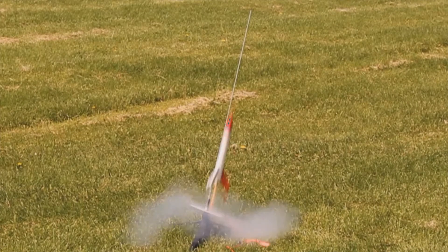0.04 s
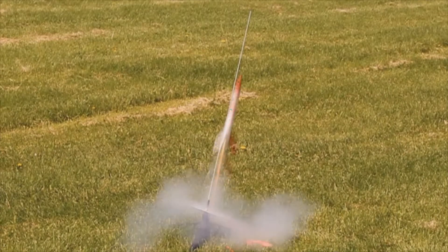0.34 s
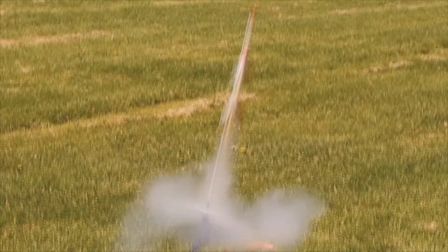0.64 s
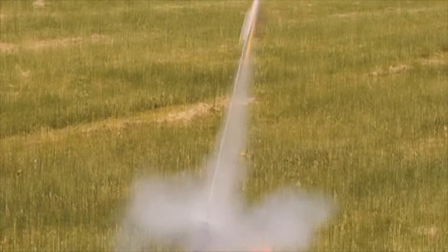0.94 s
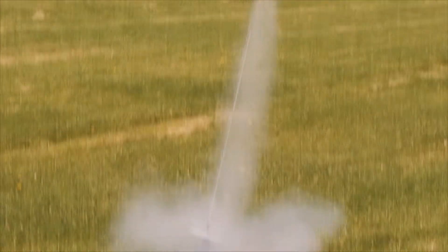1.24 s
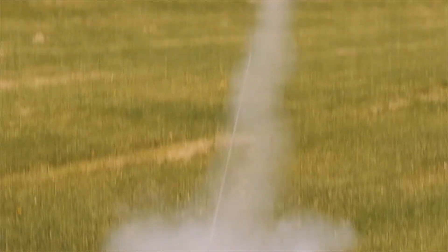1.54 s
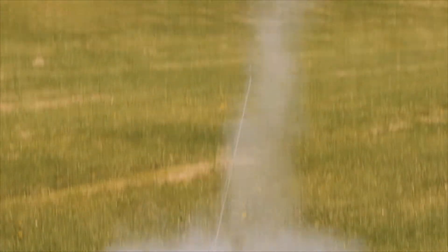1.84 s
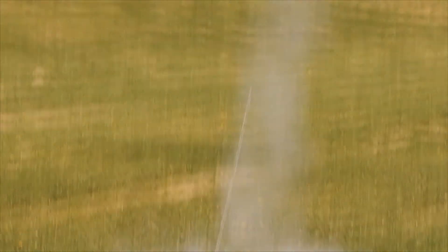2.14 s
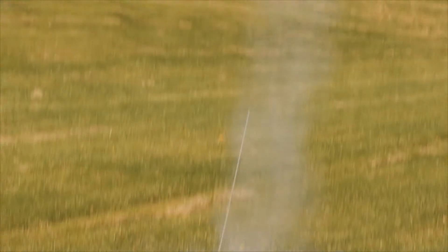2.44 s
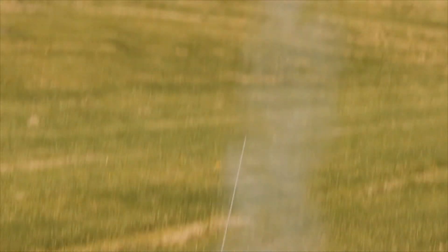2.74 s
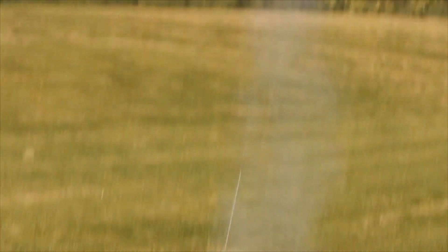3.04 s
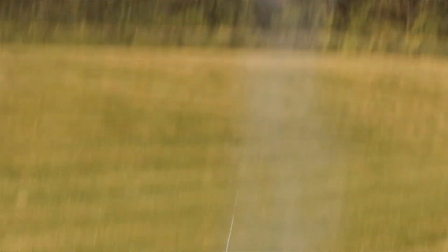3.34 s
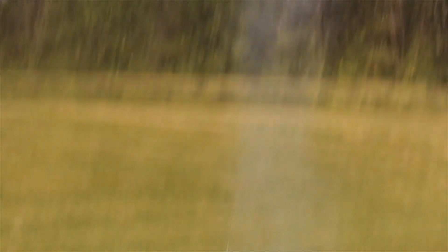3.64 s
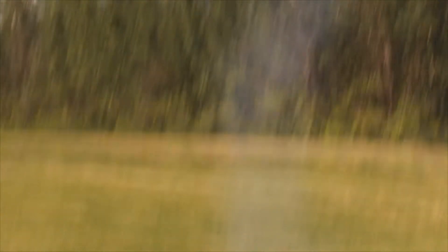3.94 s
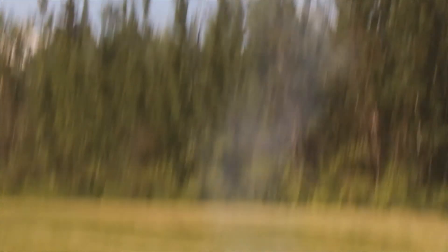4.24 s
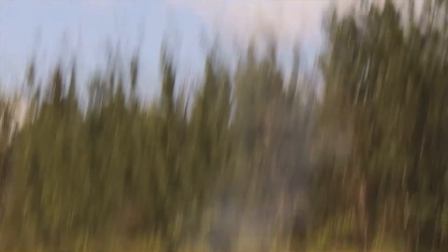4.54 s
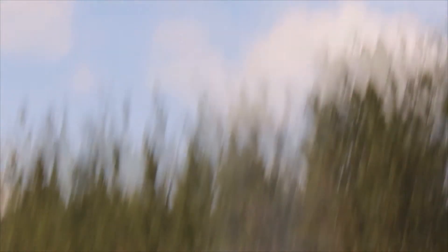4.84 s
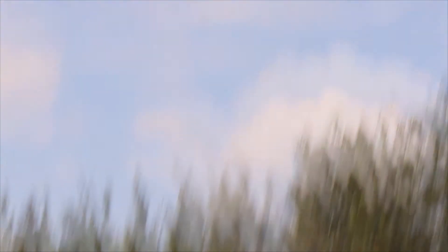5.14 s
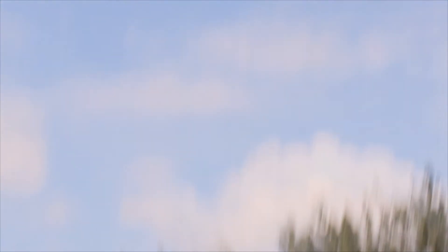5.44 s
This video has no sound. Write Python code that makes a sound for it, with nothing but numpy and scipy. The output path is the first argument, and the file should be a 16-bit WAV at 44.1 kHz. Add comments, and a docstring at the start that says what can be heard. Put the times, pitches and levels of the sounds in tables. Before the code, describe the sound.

A model rocket launches in an open field, slowed down so that it sounds deep and dull, heard from one microphone away from the pad. The roar is loud from the start, hollow and surging as the exhaust strikes the launch plate, with a crackling hiss above and a low shudder beneath. The propellant pops at about 0.1, 0.2 and 0.6 seconds, most strongly at 1.1, and again at 1.7. Three faint, thin, dry ticks fall within the first 0.4 seconds. Between 1 and 2.5 seconds the roar rises a little in pitch and becomes a freer, slightly quieter rush, with the crackle a bit brighter. It holds fairly steady and swells slightly around 4 seconds. At about 4.5 seconds the motor burns out; the roar sinks in pitch and fades with the hiss, leaving a faint, fading low rumble until about 5.7 seconds.

```python
"""Model rocket launch in slow motion

One microphone in a field, off from the launch pad; slowed down, everything sounds deep and dull.
The exhaust first beats on the blast plate, then roars freely, crackling and popping as the
propellant burns unevenly. The roar dies away and leaves a low rumble over the field."""
import sys
import numpy as np
from scipy import signal
from scipy.fft import rfft, irfft, next_fast_len
from scipy.io import wavfile
from scipy.ndimage import uniform_filter1d, minimum_filter1d, map_coordinates

SR = 44100
rng = np.random.default_rng(int(sys.argv[2]) if len(sys.argv) > 2 else 0)


def store_wav(level_fs):
    """Save 16-bit WAV to argv[1]."""
    pcm = np.round(np.clip(np.atleast_2d(level_fs), -1, 1) * 32767)
    wavfile.write(sys.argv[1], SR, pcm.T.astype(np.int16))


N = 250488
TIME = np.arange(N) / SR
BURNOUT_S, TOP_HZ = 4.518, 2440  # the motor stops; the top of the slowed-down band

# Loudness of the roar while the motor burns: time_s, level_db
ROAR_LEVEL = [(0.03, -13), (0.04, -15.5), (0.18, -11), (0.46, -18.5), (0.56, -15), (0.6, -19),
              (1.03, -15.5), (1.06, -13.5), (1.11, -19.5), (1.39, -23.5), (1.53, -17), (2.23, -27),
              (2.26, -21), (3.56, -21.5), (4.12, -18), (4.5, -20.5), (4.6, -17.5)]
# Centre of the free jet's roar: time_s, pitch_hz
ROAR_PITCH = [(1.1, 219), (2.4, 345), (3.2, 369), (4.2, 364), (4.8, 309.7), (5.68, 159.5)]
# Humps in the free jet's spectrum, relative to that centre: pitch_ratio, width_ratio, level_db
ROAR_HUMPS = [(.62, .5, -3), (1.08, 0.52, 0.5), (1.6, 0.66, -9)]
# Low, hollow resonances of the jet on the plate: pitch_hz, width_hz, level_db
PLATE_LOW_MODES = [(190, 42, 0), (284, 48, -1), (440, 410, -5), (640, 79, -6.5), (724, 100, -7.5)]
def roar(edge_hz=800, flutter_db=0.75, trim_db=0.08):
    """Large eddies make a broad, humped roar that rises in pitch as the jet clears the ground."""
    roll_off = lambda hz: 1 / (1 + (hz / edge_hz) ** 6)
    on_plate = lambda hz, t: resonances(PLATE_LOW_MODES, hz) * roll_off(hz)

    def free(hz, t):
        centre_hz = curve(ROAR_PITCH, t)
        humps = [(ratio * centre_hz, width * centre_hz, db) for ratio, width, db in ROAR_HUMPS]
        return resonances(humps, hz) * roll_off(hz)

    eddies = exhaust(turbulence(shocks_per_s=350, shock_share=0.24), free, on_plate, size=4096)
    level_db = curve(ROAR_LEVEL) + trim_db - burnout_fade(db_per_s=25, linger_s=0.059)
    return amp(level_db + flutter_db * wobble(knots_per_s=35)) * eddies


# Loudness of the hiss while the motor burns: time_s, level_db
HISS_LEVEL = [(0.0, -23), (0.38, -13), (0.81, -23.5), (1.04, -19), (1.09, -23.5), (1.37, -26.5),
              (1.6, -19.5), (1.81, -21), (1.86, -18), (1.97, -25.5), (2.66, -25), (2.78, -28.5),
              (3.01, -23.5), (3.78, -26), (3.87, -21), (4.57, -26), (4.6, -24)]
# Spectrum of the hiss in free air, before its tilt: frequency_hz, level_db
HISS_SPECTRUM = [(450, -27), (780, 0.5), (900, 0.5), (1060, 0), (1300, 2.5), (1600, -1), (2000, -3),
                 (2280, -3.5), (2420, -11)]
# Upper resonances of the jet on the plate: pitch_hz, width_hz, level_db
PLATE_HIGH_MODES = [(1201, 120, 0), (1343, 150, -3), (1693, 330, -1.5), (2050, 270, -4)]
def hiss(pivot_hz=1400, plate_edge_hz=2250, plate_db_per_oct=-8.5, free_db_per_oct=3.5, flutter_db=0.5):
    """Fine eddies and shocks near the nozzle crackle, brighter as the jet leaves the plate."""
    def tilt(hz, t):
        db_per_oct = free_db_per_oct + (plate_db_per_oct - free_db_per_oct) * curve(PLATE_SHARE, t)
        octaves = np.log2(np.clip(hz, pivot_hz, TOP_HZ) / pivot_hz)
        return amp(db_per_oct * octaves) ** 2

    roll_off = lambda hz: 1 / (1 + (hz / plate_edge_hz) ** 20)
    free = lambda hz, t: spectrum_gain(HISS_SPECTRUM, hz) ** 2 * tilt(hz, t)
    on_plate = lambda hz, t: resonances(PLATE_HIGH_MODES, hz) * tilt(hz, t) * roll_off(hz)
    eddies = exhaust(turbulence(shocks_per_s=700, shock_share=0.31), free, on_plate)
    level_db = curve(HISS_LEVEL) - burnout_fade(db_per_s=28)
    return amp(level_db + flutter_db * wobble(knots_per_s=60)) * eddies


# How much of the jet strikes the blast plate, 0 to 1: time_s, share
PLATE_SHARE = [(0, 0.95), (.55, 0.99), (1.05, 0.63), (1.4, 0.4), (2.1, 0.19)]
def exhaust(source, free, on_plate, size=2048):
    """As the rocket climbs, the jet's power spectrum glides from that on the plate to that in free air."""
    hz, t, frames = signal.stft(source, SR, nperseg=size)
    hz = hz[:, None]
    share = curve(PLATE_SHARE, t)
    normalised = lambda power: power / np.sum(power * (hz < TOP_HZ), axis=0)
    power = share * normalised(on_plate(hz, t)) + (1 - share) * normalised(free(hz, t))
    _, coloured = signal.istft(frames * np.sqrt(power * size / 2), SR, nperseg=size)
    return coloured[:N]


def turbulence(shocks_per_s, shock_share):
    """Smooth eddy noise with a dense patter of small shocks in it, rms 1."""
    shocks = (rng.random(N) < shocks_per_s / SR) * rng.uniform(0.43, 1, N)
    eddies = rng.standard_normal(N)
    return np.sqrt(1 - shock_share) * eddies + np.sqrt(shock_share) * unit(shocks - shocks.mean())


def burnout_fade(db_per_s, linger_s=0):
    """Decibels lost as the jet fades steadily, starting linger_s after the motor burns out."""
    return db_per_s * np.maximum(TIME - BURNOUT_S - linger_s, 0)


# Pops of the burning propellant: time_s, level_db, half_length_s
PROPELLANT_POPS = [(0.139, -7, .0008), (.1935, -7, 0.00056), (.5575, -7, 0.00062), (1.0595, -10.5, 0.0011),
                   (1.0645, -3, 0.0008), (1.6825, -6, 0.00065), (5.576, -30, 0.0007)]
def pops():
    """Each pop reaches the microphone as one pressure wave: a push, then a suction."""
    out = np.zeros(N)
    for time_s, level_db, half_length_s in PROPELLANT_POPS:
        offset = (TIME - time_s) / half_length_s
        out -= amp(level_db) * offset * np.exp((1 - offset ** 2) / 2)
    return out


# Spectrum of the rumble over the field: frequency_hz, level_db
RUMBLE_SPECTRUM = [(12, -32), (25, -21.5), (36, -15), (48, -15), (62, -4), (85, 3.5), (115, 1.5), (145, 1),
                   (190, -10), (280, -41)]
def rumble(level_db=-37, swell_share=0.65):
    """The deepest part of the exhaust rolls over the ground, swelling with the roar and outlasting it."""
    air = unit(filtered(rng.standard_normal(N), lambda hz: spectrum_gain(RUMBLE_SPECTRUM, hz)))
    roar_db = curve(ROAR_LEVEL)
    swell_db = swell_share * (roar_db - roar_db.mean())
    return amp(level_db + swell_db - burnout_fade(db_per_s=22, linger_s=0.5)) * air


def launch_pad(ring_hz=33, width_hz=14, level_db=-35):
    """The launch pad shudders while the jet pushes on its plate."""
    shudder = unit(filtered(rng.standard_normal(N), lambda hz: resonances([(ring_hz, width_hz, 0)], hz)))
    return amp(level_db) * curve(PLATE_SHARE) * shudder


def ground_echo(x, delay_s=0.0134, strength=0.2, grass_hz=700):
    """A weak echo off the ground makes the roar hollow at the microphone; grass swallows its treble."""
    echo = lambda hz: strength * np.exp(-2j * np.pi * hz * delay_s) / (1 + (hz / grass_hz) ** 2)
    return filtered(x, lambda hz: 1 + echo(hz))


# Ticks of the overloaded recorder: time_s, peak_db, low_edge_hz
OVERLOAD_TICKS = [(0.138, -34, 2800), (.2744, -28, 2600), (.391, -34.5, 4500)]
def overload_ticks(high_edge_hz=8500):
    """The loud start of the launch overloads the recorder: faint dry ticks, thin and bright."""
    out = np.zeros(N)
    low_pass = lambda hz: 1 / (1 + (hz / high_edge_hz) ** 8)
    for time_s, peak_db, low_edge_hz in OVERLOAD_TICKS:
        high_pass = lambda hz: hz ** 2 / (hz ** 2 + low_edge_hz ** 2)
        impulse = np.arange(N) == round(time_s * SR)
        tick = filtered(impulse, lambda hz: high_pass(hz) * low_pass(hz))
        out += amp(peak_db) * tick / tick.max()
    return out


def limiter(x, ceiling=0.96, size=200):
    """The gain ducks for a few milliseconds around any peak that would pass the ceiling."""
    needed_gain = ceiling / np.maximum(np.abs(x), ceiling)
    return x * uniform_filter1d(minimum_filter1d(needed_gain, 2 * size), size)


def amp(db):
    """Decibels to gain."""
    return 10 ** (np.asarray(db) / 20)


def unit(x):
    """x at rms 1."""
    return x / np.sqrt(np.mean(x ** 2) + 1e-20)


def spectrum_gain(points, hz):
    """Gain from (frequency_hz, level_db) points, read on a log frequency axis."""
    points_hz, points_db = np.transpose(points)
    return amp(np.interp(np.log(hz + 1), np.log(points_hz + 1), points_db))


def curve(points, t=TIME):
    """(time_s, value) points read at the times t."""
    return np.interp(t, *np.transpose(points))


def wobble(knots_per_s):
    """A smooth random curve."""
    knots = rng.standard_normal(int(N * knots_per_s / SR) + 4)
    return map_coordinates(knots, [TIME * knots_per_s])


def filtered(x, response):
    """x through a frequency response."""
    size = next_fast_len(N + SR // 2)
    return irfft(rfft(x, size) * response(np.fft.rfftfreq(size, 1 / SR)), size)[:N]


def resonances(modes, hz):
    """Power response of a few broad resonances."""
    return sum(amp(db) ** 2 * (hz * width) ** 2 / ((pitch ** 2 - hz ** 2) ** 2 + (hz * width) ** 2)
               for pitch, width, db in modes)


def scene():
    """The whole launch from one microphone position in the field."""
    jet = roar() + hiss() + rumble()
    return (ground_echo(jet) + launch_pad() + pops())[None]


def record(dry):
    """Slow motion brings the band limit far down; the recorder holds back peaks and ticks faintly."""
    band = lambda hz: 1 / np.sqrt(1 + np.minimum(hz / (TOP_HZ - 50), 2) ** 170)
    dull = filtered(dry[0], band)
    return (limiter(dull) + overload_ticks())[None]


dry = scene()
out = record(dry)
store_wav(out)
```